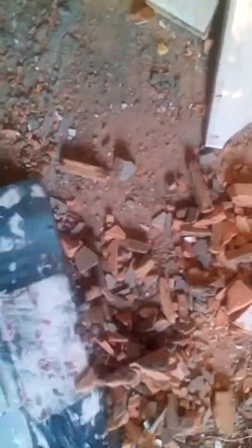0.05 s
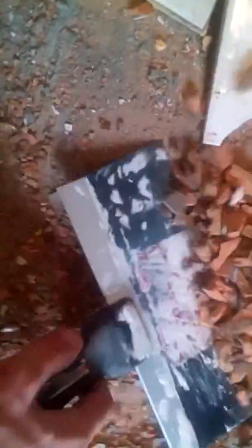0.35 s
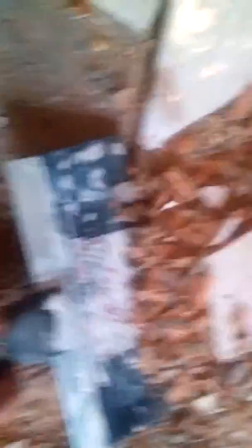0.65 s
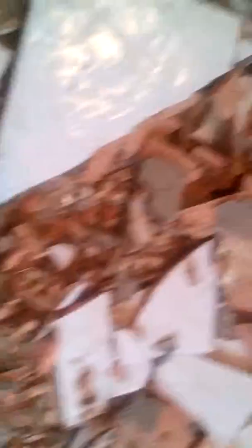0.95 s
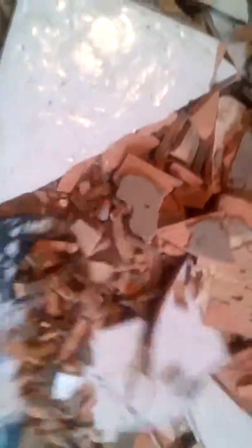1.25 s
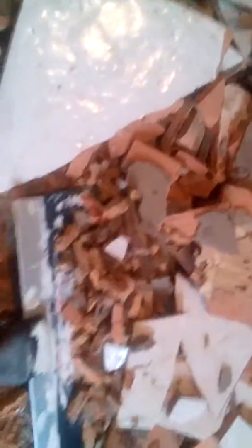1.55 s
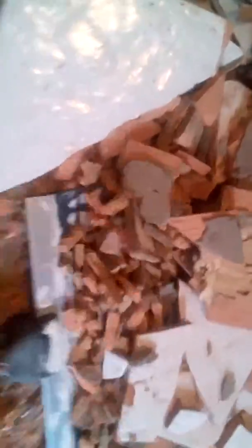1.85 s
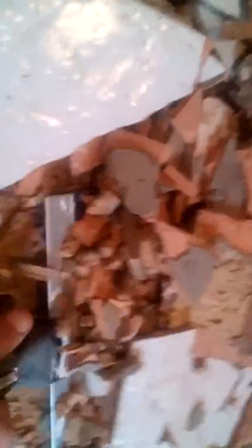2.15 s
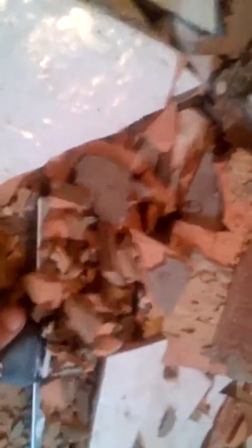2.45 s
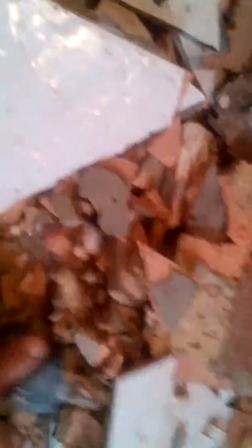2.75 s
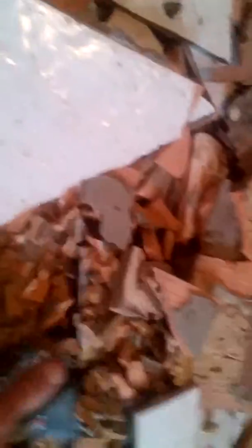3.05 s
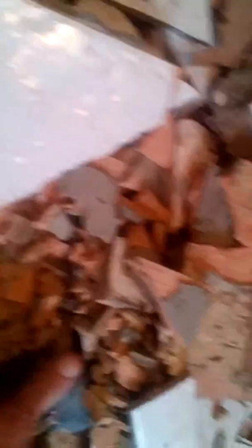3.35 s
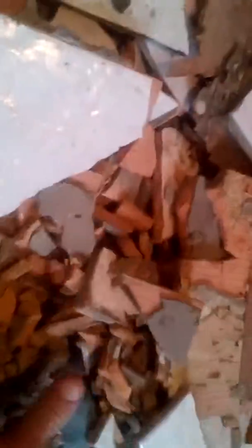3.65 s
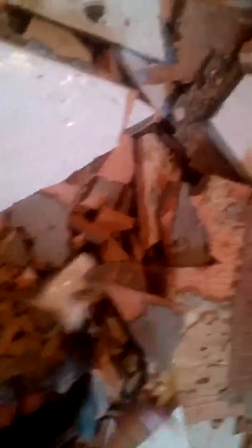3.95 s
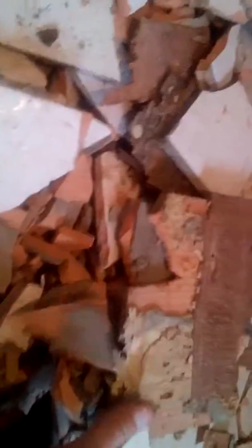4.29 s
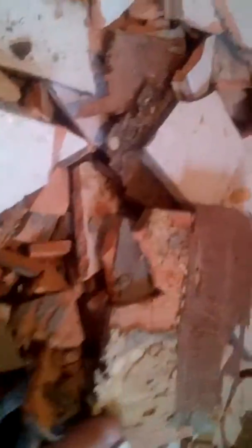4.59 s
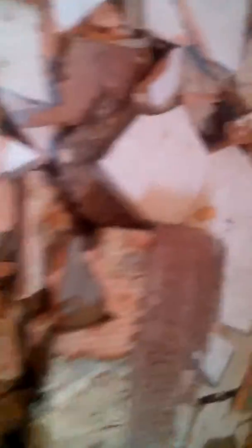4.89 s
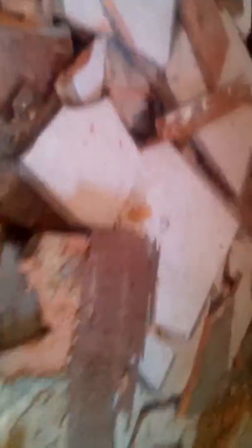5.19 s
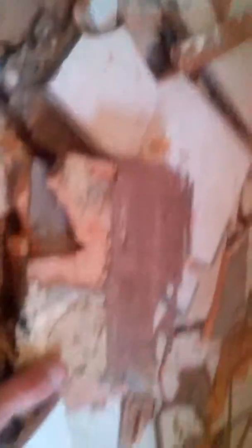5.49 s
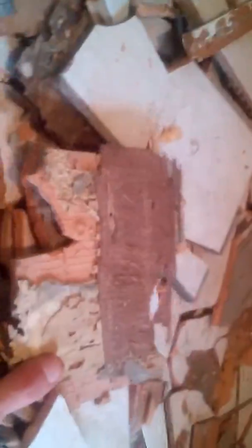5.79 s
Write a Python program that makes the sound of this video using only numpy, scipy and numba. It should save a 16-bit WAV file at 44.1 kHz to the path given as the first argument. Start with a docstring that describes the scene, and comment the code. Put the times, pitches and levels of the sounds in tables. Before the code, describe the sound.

Close crunching and clattering of tile rubble pushed into a booming tray by a steel blade that sometimes rings and squeaks.

```python
"""Gritty crunches come in strokes: a steel blade scoops broken floor tile into a tray in a bare room. Countless
chips tick under the edge, larger shards knock together, and the blade rings when struck and squeals as it
sticks and slips. Underneath, the tray booms and rattles as the rubble slides in. The microphone is close, and
the loudest peaks are slightly flattened."""
import sys
import numpy as np
from scipy import signal
from scipy.io import wavfile
from scipy.ndimage import uniform_filter1d
from numba import njit

SR = 44100
rng = np.random.default_rng(int(sys.argv[2]) if len(sys.argv) > 2 else 0)


def inscribe(sig):
    """Save sig as 16-bit PCM at rate SR to the path in sys.argv[1].

    A 1-D sig is mono; a 2-D sig holds one channel per row.
    Samples are clipped to [-1, 1] before scaling.
    """
    pcm = np.round(np.clip(np.atleast_2d(sig).T, -1, 1) * 32767)
    wavfile.write(sys.argv[1], SR, pcm.astype(np.int16))


N = 257103
MIDDLING_PUSH_DB = -20

# The tone colour of broken tile. Each row: frequency in Hz, relative level in dB.
TILE_COLOUR = [(400, -1), (580, -6.5), (780, -5.5), (1000, -2.5), (1700, 2.5), (2800, 1.5), (4100, 2.5),
               (5400, -2), (6800, -8), (7500, -12), (8400, -49)]


def from_db(db):
    """Decibels to gain."""
    return 10 ** (np.asarray(db) / 20)


def unit_rms(x):
    """Scale to rms 1."""
    return x / np.sqrt(np.mean(x ** 2) + 1e-20)


def over_time(points):
    """Draw a curve of (seconds, value) points across the whole scene."""
    return np.interp(np.arange(N) / SR, *np.transpose(points))


def at_hz(points, hz):
    """Read a spectrum on a log-frequency axis."""
    points_hz, levels = np.transpose(points)
    return np.interp(np.log(hz), np.log(points_hz), levels)


def add(out, s, sound):
    """Mix a sound in at s seconds."""
    start = int(s * SR)
    out[:, start:start + sound.shape[1]] += sound[:, :N - start]


def steady(x, seconds):
    """Even out the slow level of a stereo texture, leaving its grain."""
    return x / np.sqrt(uniform_filter1d(x.mean(0) ** 2, int(seconds * SR)) + 1e-12)


def stereo(mid, side, hz):
    """Left and right microphone ports: alike in the bass, opposed in the treble."""
    # Stereo width. Each row: frequency in Hz, side minus mid in dB.
    width = [(100, -27.5), (300, -20.5), (600, -16), (1500, -15), (2400, -15.5), (3200, -4.5), (4300, -3),
             (5200, 2.5), (6300, 4.5), (7500, 10), (8400, 15.5)]
    # Stereo balance. Each row: frequency in Hz, left minus right in dB.
    lean = [(200, 0), (1000, -1.7), (3000, -2), (4500, -2), (6000, 0.1), (7500, 0.5)]
    sign = np.array([[1], [-1]])
    return (mid + sign * side * from_db(at_hz(width, hz))) * from_db(sign * at_hz(lean, hz) / 2)


def resonate(x, hz, width_hz):
    """A resonance that gives out the same energy whatever its width."""
    radius = np.exp(-np.pi * width_hz / SR)
    feedback = [1, -2 * radius * np.cos(2 * np.pi * hz / SR), radius ** 2]
    return signal.lfilter(np.sqrt(1 - radius ** 2) * np.array([1, 0, -1]), feedback, x + 1e-18)


@njit
def ring_modes(starts, poles, heights, lengths, total):
    """Sum of decaying cosines, each with its own start, pole and left and right height."""
    out = np.zeros((2, total))
    for k in range(len(starts)):
        swing = 1 + 0j
        for i in range(starts[k], min(starts[k] + lengths[k], total)):
            out[0, i] += heights[0, k] * swing.real
            out[1, i] += heights[1, k] * swing.real
            swing *= poles[k]
    return out


def pole(hz, t60_samples):
    """One sample's turn and decay of a ringing mode."""
    return from_db(-60 / t60_samples) * np.exp(2j * np.pi * hz / SR)


def rings(rows):
    """Struck modes that ring out, one for each row."""
    s, level_db, hz, t60 = np.transpose(rows)
    samples = np.maximum(t60, .003) * SR
    mid, side = rng.choice([-1., 1.], (len(s), 2)).T * from_db(level_db)
    return ring_modes((s * SR).astype(int), pole(hz, samples), stereo(mid, side, hz), samples.astype(int), N)


def contacts(per_s, spread_db, clump_db=3, clumps_per_s=70):
    """Sample positions and uneven sizes of contacts that come in small avalanches."""
    knots = rng.standard_normal(N // 20)
    surge = unit_rms(np.interp(np.arange(N) * (clumps_per_s / SR), np.arange(len(knots)), knots))
    at = np.flatnonzero(rng.random(N) < per_s * from_db(clump_db * surge) / SR)
    sizes = from_db(spread_db * np.minimum(rng.exponential(1, N), 4))
    return at, sizes[at]


def bumped(modes, per_s, spread_db, even_s):
    """A resonant body under a run of small bumps, evened out to level 1."""
    at, size = contacts(per_s, spread_db)
    out = np.zeros((2, N))
    for hz, width_hz, mode_db in modes:
        clicks = np.zeros((2, N))
        clicks[:, at] = stereo(*rng.standard_normal((len(at), 2)).T * size, hz)
        ringing = resonate(clicks, hz, width_hz)
        out += from_db(mode_db) * unit_rms(resonate(ringing, hz, hz))  # a broad pass trims the skirts
    return steady(out, even_s)


def swell(s, start, rise, hold, fall, level_db):
    """Power of one push at the times s: it builds as the blade bites, holds, then dies away."""
    t = s - start
    attack = np.clip(t / rise, 0, 1) ** 1.3
    decay_db = 60 * np.maximum(t - rise - hold, 0) / fall
    return (attack * from_db(level_db - decay_db)) ** 2


def push_envelopes(tray_lag_s=.024, boom_fall_s=1.0, rattle_fall_s=.71):
    """All pushes together, in dB over time: crunch, treble tilt, tray boom and tray rattle."""
    # Pushes through the rubble. Each row: start, rise, hold and 60 dB fall in seconds,
    # then crunch, treble tilt, boom and rattle in dB.
    strokes = [(-.046, .03, .14, .95, -21, 0.5, -38, -29.5), (.36, .175, .055, .48, -15, .5, -32.5, -27.5),
               (.682, .008, .005, .55, -19.5, 5.5, -49, -43), (.8, .03, .01, .25, -27.5, 1.5, -56, -49),
               (.95, .075, .05, .33, -21.5, 2, -33, -34), (1.215, .055, .015, .35, -22, -2, -48, -36.5),
               (1.345, .05, .09, .55, -17, 0, -30.5, -29.5), (1.383, .146, .18, .48, -13.4, .5, -24.5, -29),
               (1.9, .032, .008, .25, -21, -1.5, -43, -42),
               (2.085, .055, .185, .38, -14.5, -.5, -29.5, -32), (2.35, .09, .175, .95, -17.5, 0, -27, -31),
               (2.734, .07, .067, .52, -16, .5, -27, -32.5), (2.96, .135, .055, .9, -14, 0.5, -23, -26),
               (3.3, .012, .072, .4, -25, -1, -27, -34.5), (3.37, .073, .018, .5, -15.5, 1.5, -24, -29),
               (3.61, .008, .008, .4, -22, -3, -27.5, -31.5), (3.735, .05, .014, .6, -18, 0.5, -30, -32.5),
               (3.84, .038, .016, .4, -13.2, 1.5, -26.5, -29),
               (3.915, .085, .135, .64, -14.8, -0.5, -25, -25.5),
               (4.35, .03, .025, .8, -29, -2.5, -39, -41), (4.65, .02, .05, .6, -28.5, 0, -40, -38.5),
               (4.82, .04, .02, .45, -29, -1.5, -33.5, -35.5),
               (4.945, .03, .03, .45, -22.5, -2, -26.5, -35), (5.17, .048, .028, .38, -15.5, -1, -24, -25),
               (5.41, .06, .105, .25, -25.5, -1.5, -32, -39),
               (5.645, .012, 0.0049, .9, -26, -1.5, -29.5, -32)]
    s = np.arange(0, N / SR, .001)
    grit, boom, rattle = from_db([-35.5, -42, -47.5]) ** 2  # grit keeps trickling between pushes
    treble = 0
    for start, rise, hold, fall, crunch_db, treble_db, boom_db, rattle_db in strokes:
        push = swell(s, start, rise, hold, fall, crunch_db)
        grit += push
        treble += push * treble_db
        # the load reaches the tray late and rocks on; the hollow rattle stops sooner
        boom += swell(s, start + tray_lag_s, rise, hold, boom_fall_s, boom_db)
        rattle += swell(s, start, rise, hold, rattle_fall_s, rattle_db)
    levels = 10 * np.log10(grit), treble / grit, 10 * np.log10(boom), 10 * np.log10(rattle)
    return [np.interp(np.arange(N) / SR, s, level) for level in levels]


def handling_rumble(level_db, corner_hz):
    """A faint steady rumble at the hand-held microphone."""
    low_pass = signal.butter(2, corner_hz, fs=SR, output="sos")
    return from_db(level_db) * unit_rms(signal.sosfilt(low_pass, rng.standard_normal(N)))


def room(x, t60_s, level_db):
    """Bare walls return a short diffuse tail, different left and right."""
    t = np.arange(SR // 2) / SR
    tail = rng.standard_normal((2, len(t))) * from_db(-60 * t / t60_s) * (t > .004)
    tail /= np.sqrt(np.sum(tail ** 2, axis=1, keepdims=True))
    return from_db(level_db) * signal.fftconvolve(x, tail, axes=1)[:, :N]


def loaded(modes):
    """The balance of the tray's resonances shifts as it fills."""
    # The load in the tray. Each row: time in seconds, share filled from 0 to 1.
    filling = [(.5, 0.08), (1.9, 1)]
    fill = over_time(filling)
    return [(hz, width, light + fill * (full - light)) for hz, width, light, full in modes]


def tray_boom(level_db):
    """Rubble bumps the tray's deepest resonances, and jolts to blade or tray add thumps."""
    # Deep modes. Each row: pitch and width in Hz, relative dB when light and when full.
    modes = [(76.8, 11, -5.5, -4), (99.9, 14, -13, -1), (129.3, 8.2, 3, -1.5)]
    # Jolts. Each row: start in seconds, level in dB, pitch in Hz, t60 in seconds.
    thumps = [(.002, -15, 123, 0.15), (.597, -9, 256, 0.069), (1.05, -22, 123.3, .25),
              (1.395, -19, 133.6, 0.4), (1.69, -16.5, 134.3, .45), (3.19, -12.5, 128.8, 0.37),
              (5.24, -17, 122, .35)]
    return from_db(level_db) * bumped(loaded(modes), per_s=300, spread_db=2, even_s=.078) + rings(thumps)


def tray_rattle(level_db):
    """Rubble skips over the tray and stirs its hollow middle register."""
    # Hollow modes. Each row: pitch and width in Hz, relative dB when light and when full.
    modes = [(187.4, 18, 4, -0.5), (260.6, 83, 4.5, 1), (380, 190, -1, -2), (592, 43, -9.5, -4),
             (684, 310, -28.5, -7)]
    return from_db(level_db) * bumped(loaded(modes), per_s=700, spread_db=2.5, even_s=.066)


def floor_slide():
    """The blade opens with a low scrape, bumping along bare floor."""
    # The scrape's fader. Each row: time in seconds, level in dB.
    fader = [(0, -23), (.12, -27), (.2, -32.5), (.36, -37.5), (.43, -27), (.6, -28.5), (.7, -30.5),
             (.8, -49), (.95, -71)]
    # What the sliding sets ringing. Each row: pitch and width in Hz, relative level in dB.
    modes = [(120.6, 9.4, -1.5), (167.7, 10, -3), (206.7, 8.8, 3), (1360, 150, 1.5)]
    return from_db(over_time(fader)) * bumped(modes, per_s=500, spread_db=2.5, even_s=.051)


def blade_squeals(rough_db, wander_hz):
    """The edge sticks and slips: friction keeps one mode swinging for a moment, unevenly."""
    # Each row: start and length in seconds, pitch in Hz, level in dB before roughening.
    squeals = [(0.065, 0.022, 1304, -25), (0.098, 0.037, 1403, -17.5), (.412, 0.031, 1346, -23),
               (1.732, 0.087, 1995, -22.5), (2.307, 0.12, 4045, -16.5), (2.318, 0.14, 6130, -23.5),
               (2.428, 0.11, 4090, -17), (2.445, 0.12, 6070, -25.5), (4.695, .1, 2936, -22.5)]
    out = np.zeros((2, N))
    knots = np.arange(0, .3, .006)
    for start, length, hz, level_db in squeals:
        t = np.arange(int(length * SR)) / SR
        grip, wander = (np.interp(t, knots, rng.standard_normal(len(knots))) for _ in range(2))
        envelope = np.sin(np.pi * (t / length) ** .5) * from_db(level_db + rough_db * grip)
        swing = envelope * np.exp(2j * np.pi * np.cumsum(hz + wander_hz * wander) / SR)
        add(out, start, stereo(swing.imag, swing.real, hz))
    return out


def blade_ring(octaves, detune, bounce_s, bounce_db):
    """Each blow rings the steel modes nearest the pitch that its contact favours."""
    # Modes of the steel. Each row: pitch in Hz, relative level in dB, t60 in seconds.
    modes = [(2030, 4, 0.52), (2976, 4, 0.21), (3650, -5.5, 0.43), (4650, -2.5, 0.16), (5060, -10.5, 0.29),
             (5640, -12, 0.11), (6420, -12, 0.18), (7460, -1, 0.054)]
    # Blows on the blade. Each row: start in seconds, strength in dB, favoured pitch in Hz.
    blows = [(.628, -18, 5100), (.685, -20, 3300), (.790, -22.5, 3520), (.840, -22.5, 7800),
             (.958, -28, 5300), (1.011, -17.5, 4950), (3.474, -11.5, 8300), (4.236, -26.5, 5330),
             (4.56, -31, 1660), (4.659, -24, 7840), (4.778, -35, 8100), (4.981, -33.5, 1750)]
    first = np.array([(s, blow_db + mode_db - 4 * (np.log2(hz / favoured_hz) / octaves) ** 2, hz, t60)
                      for s, blow_db, favoured_hz in blows for hz, mode_db, t60 in modes])
    # the shard bounces and loads the steel, so a slightly flat second ring beats against the first
    second = (first + [bounce_s, bounce_db, 0, 0]) * [1, 1, 1 - detune, 1]
    return rings(first) + rings(second)


def knocks(rows, skirt_db, mode_count=50):
    """Each struck shard sounds a cluster of heavily damped modes around its pitch."""
    out, length = np.zeros((2, N)), SR // 10
    for s, level_db, pitch_hz, octaves, t60 in rows:
        hz = np.linspace(400, 8200, mode_count) + rng.uniform(-70, 70, mode_count)
        cluster = np.exp(-.5 * (np.log2(hz / pitch_hz) / octaves) ** 2) + from_db(skirt_db)
        gain = cluster * from_db(at_hz(TILE_COLOUR, hz))
        mid, side = rng.choice([-1., 1.], (2, mode_count)) * gain
        poles = pole(hz, max(t60, .003) * SR)
        onsets = rng.integers(0, SR // 3000, mode_count)
        hit = ring_modes(onsets, poles, stereo(mid, side, hz), np.full(mode_count, length), length)
        peak_rms = np.sqrt(uniform_filter1d(hit.mean(0) ** 2, SR // 500, mode="constant").max())
        add(out, s, hit / peak_rms * from_db(level_db))
    return out


def tumbling_shards(push_db, per_s, middling_db, scatter_db, high_hz=4730, low_hz=2060):
    """Small shards tumble at random, harder during a push; bigger ones chink lower and longer."""
    at = np.flatnonzero(rng.random(N) < per_s / SR)
    strength, size = rng.random((len(at), 2)).T
    level_db = middling_db + .65 * (push_db[at] - MIDDLING_PUSH_DB) + scatter_db * (2 * strength - 1)
    hz = high_hz * (low_hz / high_hz) ** size
    octaves = np.full(len(at), .087)
    t60 = .035 * (.5 + size)
    return knocks(zip(at / SR, level_db, hz, octaves, t60), skirt_db=-23.5)


def large_shards():
    """Big pieces knock together; sharp strikes ring single clear tones, many from the steel blade."""
    # Knocks. Each row: start in seconds, level in dB, pitch in Hz, spread in octaves, t60 in seconds.
    hits = [(.3726, -18.5, 2820, .17, 0.02), (.5518, -12.5, 1581, .38, 0.058),
            (.5995, -8.5, 1940, .31, 0.013), (.6269, -10, 4850, .16, 0.035), (.7902, -18, 2732, .39, 0.042),
            (.9224, -29, 3580, .47, .018), (.957, -20.5, 4640, .32, 0.046), (.9674, -21, 3670, .26, 0.013),
            (1.0104, -15, 4330, .61, 0.033), (1.1046, -13.5, 2360, .43, .007),
            (1.5756, -6, 3300, .8, 0.033), (1.9174, -16.5, 3070, .78, 0.023),
            (2.0597, -19.5, 3300, .69, 0.012), (2.0969, -21.5, 3400, .9, 0.036),
            (2.107, -14.5, 3400, 0.88, .04), (2.1406, -9, 2830, .79, 0.0091), (2.314, -15, 3969, .46, .056),
            (2.4, -12, 3000, .8, .015), (2.5343, -8.5, 1930, .45, 0.0092), (2.5953, -10, 2370, .42, .025),
            (2.6785, -15, 2800, .83, .039), (2.8698, -11, 2850, .39, 0.0055),
            (2.9061, -11, 3380, .53, .008), (3.0773, -14, 3600, .39, .025),
            (3.3143, -18.5, 3310, .63, 0.042), (3.449, -8.5, 4200, .41, 0.036),
            (3.475, -16.5, 4700, .98, 0.022), (3.5188, -9.5, 2679, .33, .013), (3.614, -6, 3970, .36, .022),
            (3.7404, -9.5, 4770, .34, 0.0066), (3.8519, -12.5, 3950, .24, 0.039),
            (3.918, -8, 2438, .37, 0.0086), (3.9606, -11, 3803, .52, 0.023), (4.1222, -7, 3320, .34, 0.024),
            (4.163, -11.5, 2960, .47, 0.011), (4.2356, -22, 4230, .66, .038),
            (4.2893, -22, 4300, .9, 0.023), (4.3692, -13.5, 2000, .67, 0.018),
            (4.3911, -15.5, 3770, .28, 0.015), (4.4812, -23, 3100, .88, .025),
            (4.5595, -17.5, 2400, .3, 0.072), (4.778, -10, 4250, .17, 0.013),
            (4.815, -14.5, 3940, .16, 0.02), (4.8653, -14.5, 4000, .68, 0.0063),
            (4.958, -16.5, 3200, .42, 0.043), (4.9808, -13.5, 2190, .57, 0.036),
            (5.095, -22.5, 770, .5, .022), (5.1351, -13.5, 4263, .13, 0.015),
            (5.2085, -8, 3381, .29, 0.023), (5.388, -23.5, 3300, .31, 0.021),
            (5.5285, -15.5, 3870, .15, .019), (5.5865, -13, 1910, .12, 0.019),
            (5.6495, -20, 3250, .28, .02), (5.662, -17, 2370, .75, 0.012)]
    # Tones rung by sharp strikes. Each row: start in seconds, level in dB, pitch in Hz, t60 in seconds.
    struck_tones = [(.627, -13.5, 4590, .32), (.957, -27, 4600, .2), (.627, -14.5, 6330, .06),
                    (.684, -6, 2870, 0.087), (.685, -26, 2050, 0.35), (.685, -20, 2965, .42),
                    (.790, -24, 3700, 0.52), (1.011, -18.5, 2050, 0.097), (1.011, -21, 5780, 0.17),
                    (1.011, -20.5, 3720, .3), (1.011, -21, 5070, .22), (1.592, -11, 2640, 0.058),
                    (1.605, -9, 4380, .083), (3.475, -17.5, 7290, 0.25), (3.852, -16, 5150, .08),
                    (4.03, -14, 5100, .072), (4.06, -9.5, 4080, 0.068), (4.235, -19.5, 4870, 0.13),
                    (4.561, -15.5, 2585, 0.05), (4.777, -18, 7260, 0.052)]
    return knocks(hits, skirt_db=-19.5) + rings(struck_tones)


def crunch(push_db, treble_db, per_s, t60_s, t60_spread, colour_db, trim_db, mode_count=14):
    """Countless chips touch, each with a few modes of its own. Harder pushing moves more of them."""
    at, size = contacts(per_s * from_db(.47 * (push_db - MIDDLING_PUSH_DB)), spread_db=2.5)
    pitch, freedom, *mode_places = rng.random((len(at), mode_count + 2)).T
    hz = 450 + 8200 * np.array(mode_places)
    favoured_hz = 900 * 10 ** pitch
    looseness = t60_spread ** (2 * freedom - 1)  # a buried chip only ticks, a loose one rings longer
    t60_samples = np.tile(t60_s * looseness * SR, mode_count)
    colour = at_hz(TILE_COLOUR, hz) + colour_db * np.exp(-2 * np.log2(hz / favoured_hz) ** 2)
    tilt = treble_db[at] * np.clip(np.log2(hz / 3200), -1, 1)
    gain = size * from_db(colour + tilt) / np.sqrt(looseness)
    mid, side = rng.standard_normal((2, gain.size)) * gain.ravel()
    poles = pole(hz.ravel(), t60_samples)
    lengths = (t60_samples * 2 / 3).astype(int)  # each mode stops 40 dB down
    chips = ring_modes(np.tile(at, mode_count), poles, stereo(mid, side, hz.ravel()), lengths, N)
    return steady(chips, .029) * from_db(push_db + trim_db)


def scene():
    """Shards and blade in the room, with the tray underneath."""
    push_db, treble_db, boom_db, rattle_db = push_envelopes()
    shards = crunch(push_db, treble_db, per_s=2150, t60_s=.026, t60_spread=2.2, colour_db=6, trim_db=-.59)
    shards += large_shards()
    steel = blade_ring(octaves=.39, detune=.0076, bounce_s=.011, bounce_db=-6.5)
    steel += blade_squeals(rough_db=4, wander_hz=20)
    slide = floor_slide()
    tray = tray_boom(boom_db) + tray_rattle(rattle_db)
    rumble = handling_rumble(level_db=-61.5, corner_hz=70)
    shards += tumbling_shards(push_db, per_s=17, middling_db=-21, scatter_db=2)
    return shards + room(shards, t60_s=.35, level_db=-13.5) + steel + slide + tray + rumble


def record(dry):
    """The loudest peaks are flattened, and the top end is cut."""
    cutoff_hz, ceiling = 8450, .88
    low_pass = signal.ellip(10, .2, 70, cutoff_hz, fs=SR, output="sos")
    heard = signal.sosfilt(low_pass, dry)
    flattened = heard / (1 + np.abs(heard / ceiling) ** 8) ** (1 / 8)
    return signal.sosfilt(low_pass, flattened)


dry = scene()
out = record(dry)
inscribe(out)
```